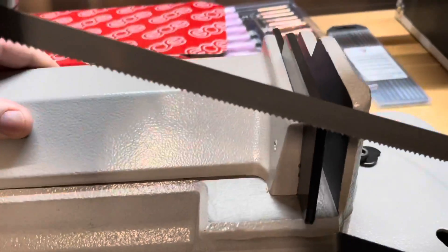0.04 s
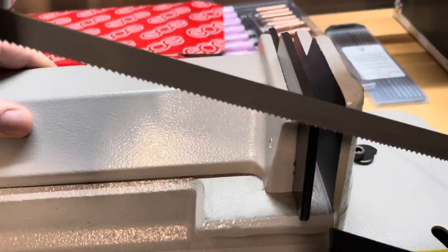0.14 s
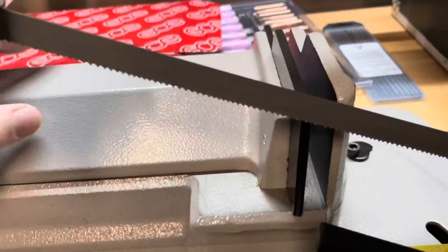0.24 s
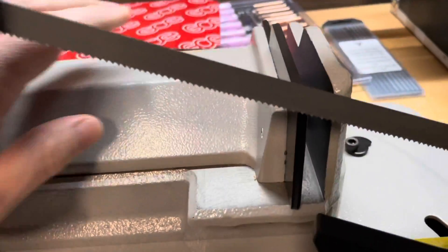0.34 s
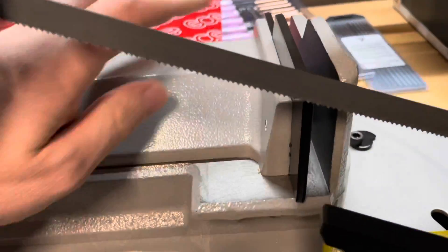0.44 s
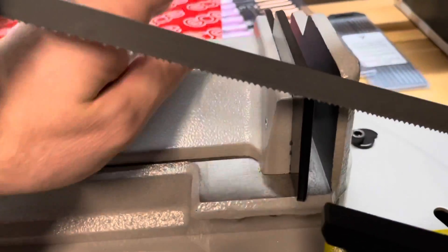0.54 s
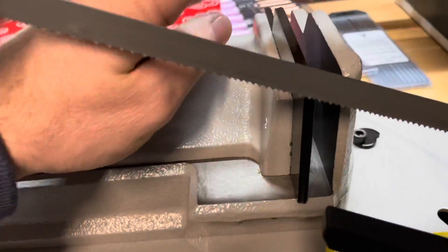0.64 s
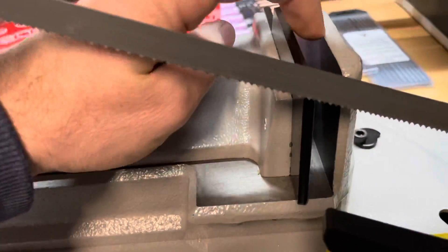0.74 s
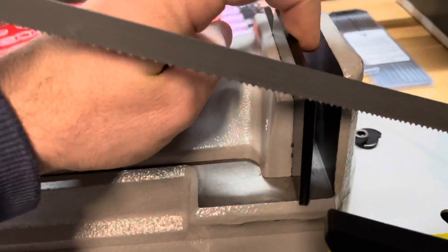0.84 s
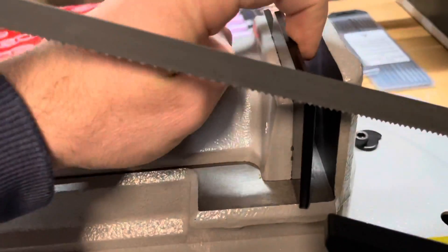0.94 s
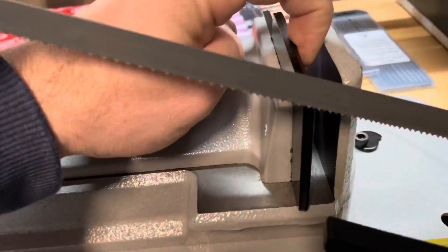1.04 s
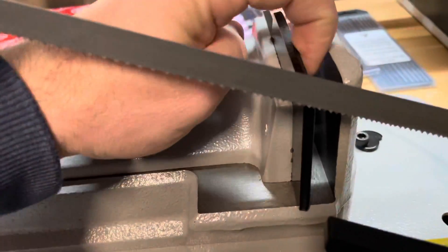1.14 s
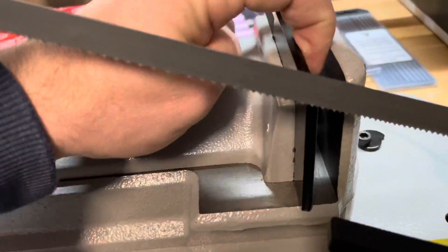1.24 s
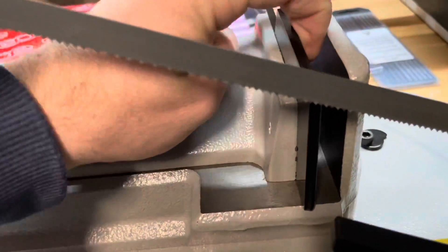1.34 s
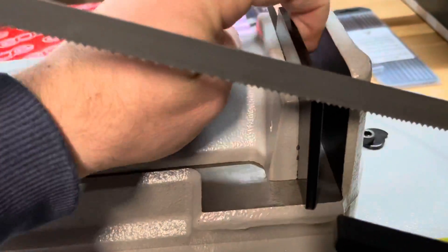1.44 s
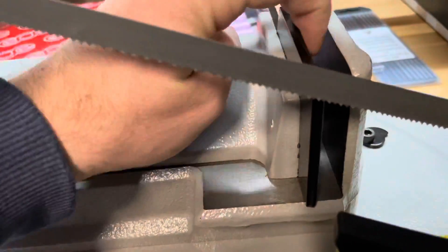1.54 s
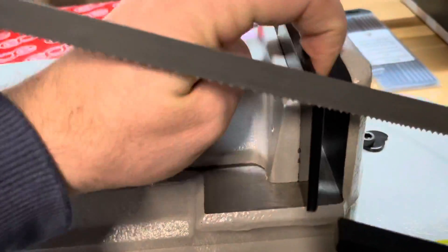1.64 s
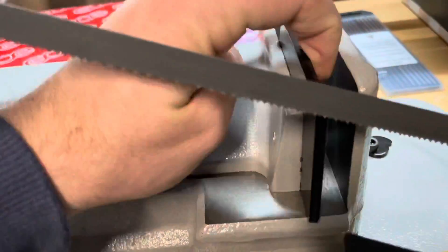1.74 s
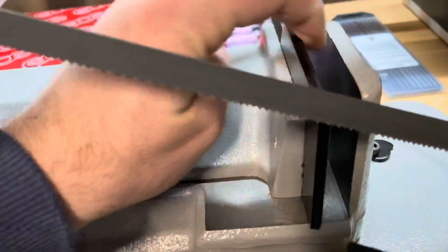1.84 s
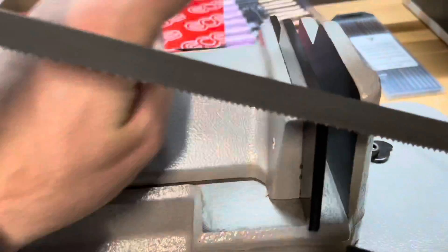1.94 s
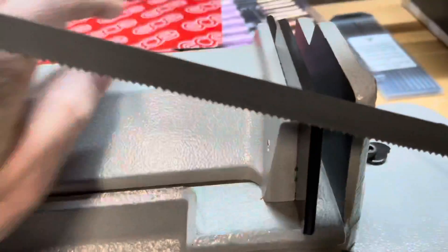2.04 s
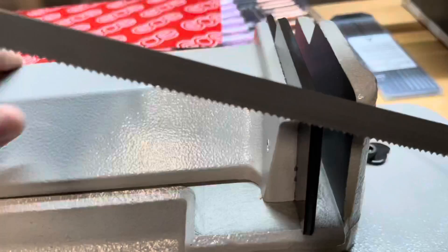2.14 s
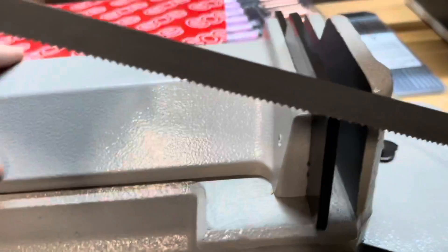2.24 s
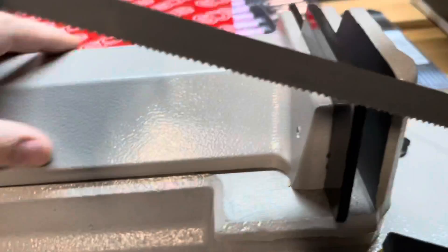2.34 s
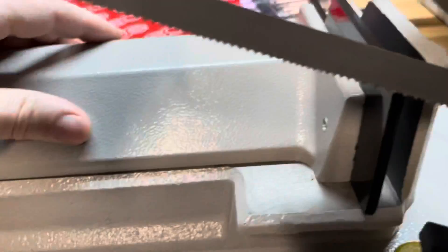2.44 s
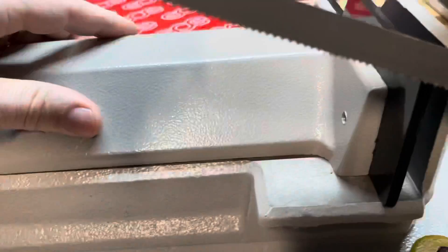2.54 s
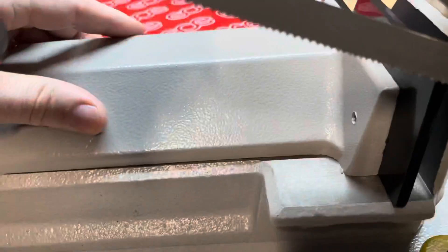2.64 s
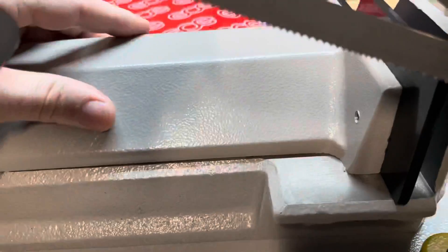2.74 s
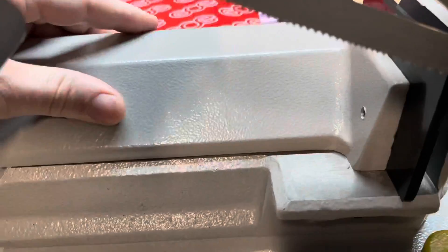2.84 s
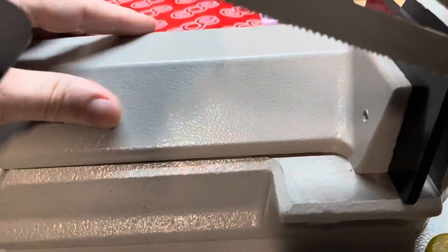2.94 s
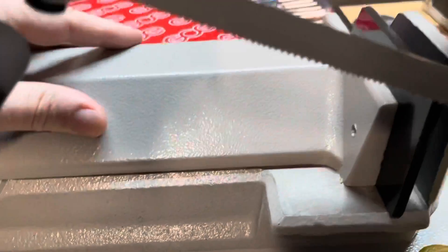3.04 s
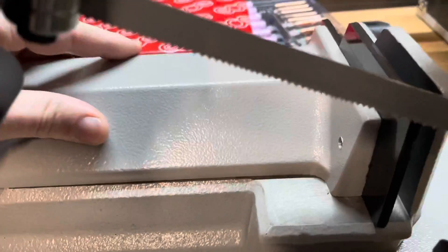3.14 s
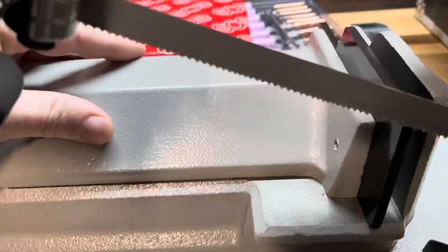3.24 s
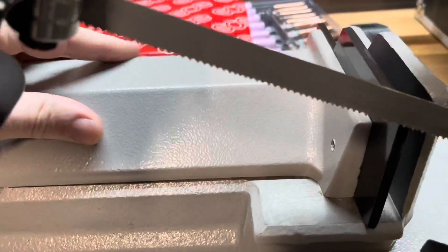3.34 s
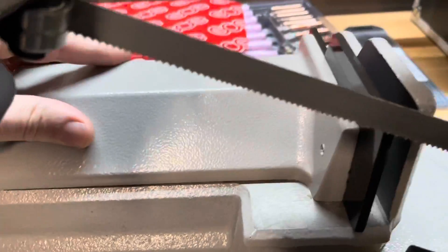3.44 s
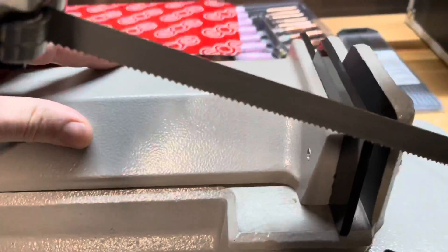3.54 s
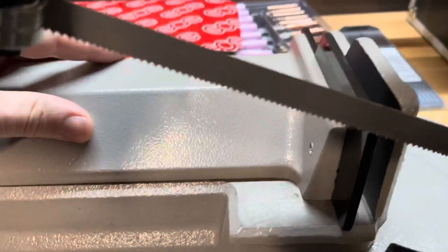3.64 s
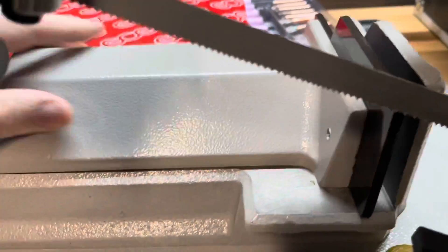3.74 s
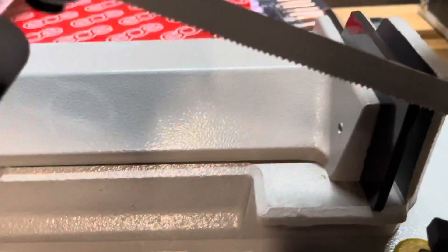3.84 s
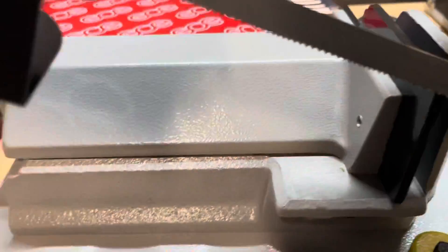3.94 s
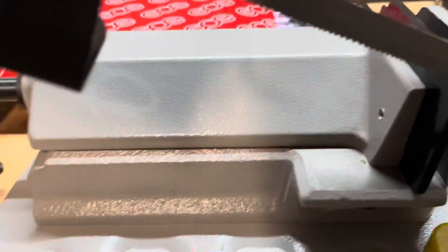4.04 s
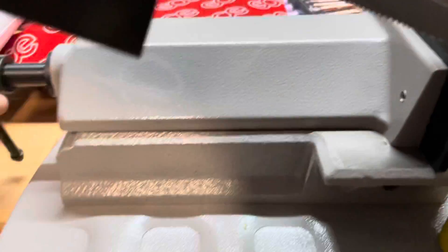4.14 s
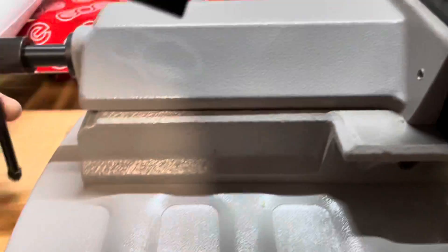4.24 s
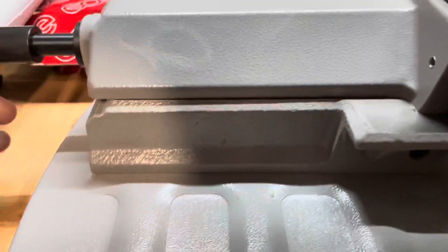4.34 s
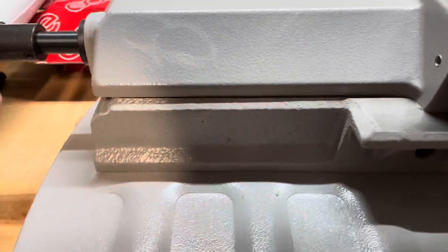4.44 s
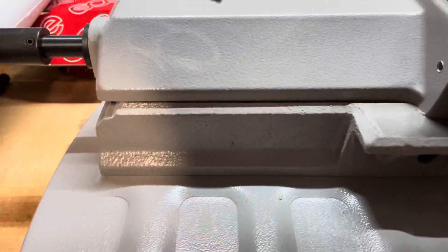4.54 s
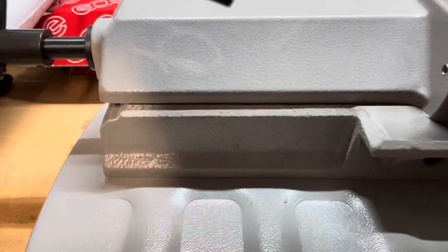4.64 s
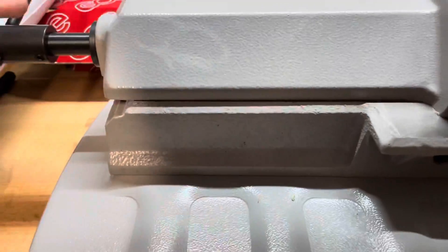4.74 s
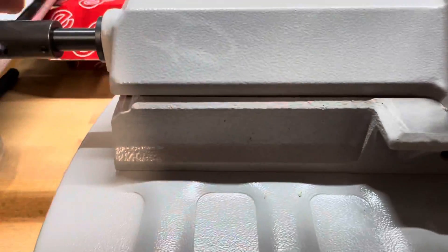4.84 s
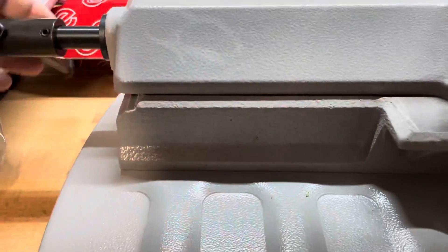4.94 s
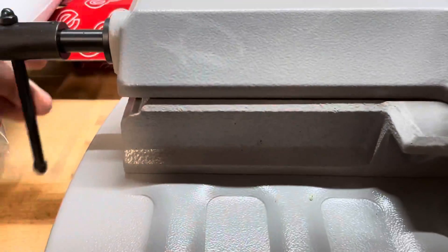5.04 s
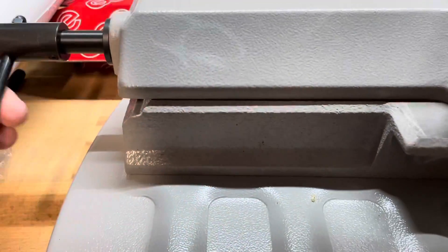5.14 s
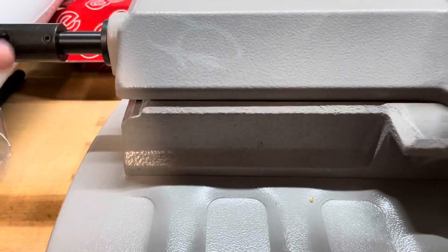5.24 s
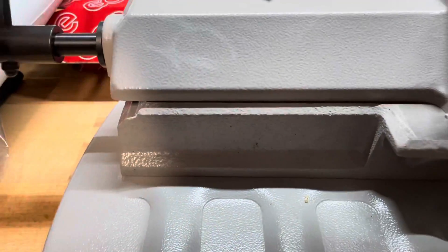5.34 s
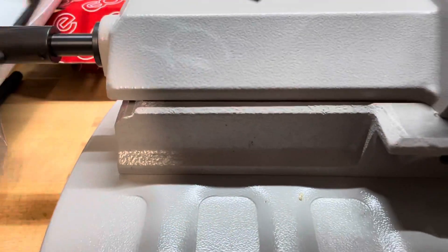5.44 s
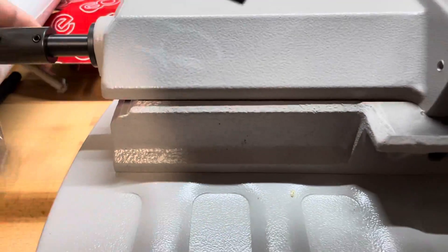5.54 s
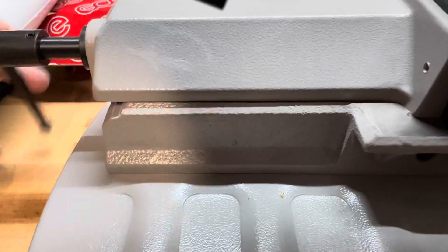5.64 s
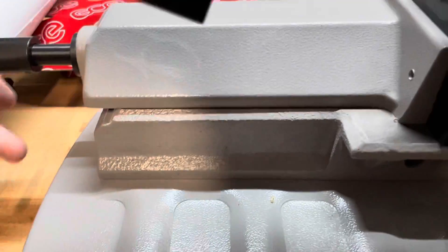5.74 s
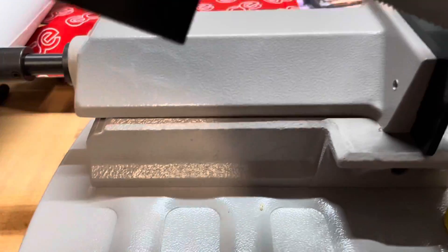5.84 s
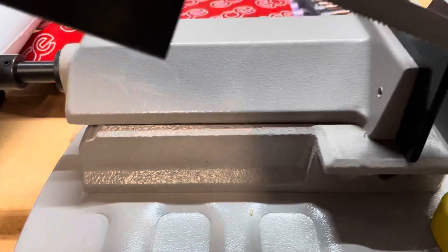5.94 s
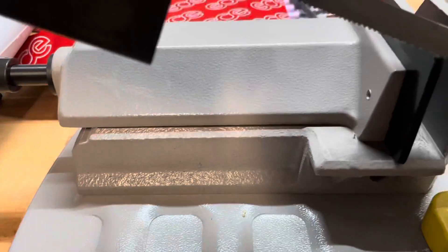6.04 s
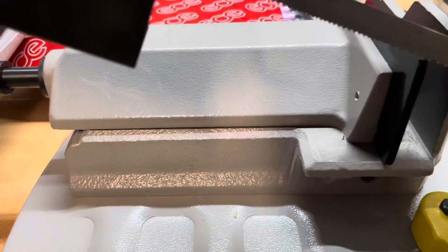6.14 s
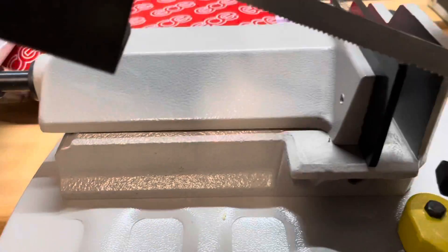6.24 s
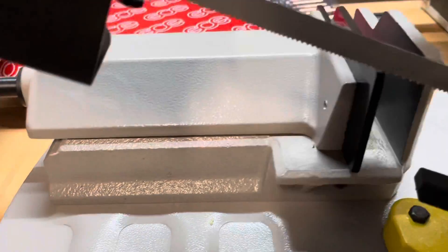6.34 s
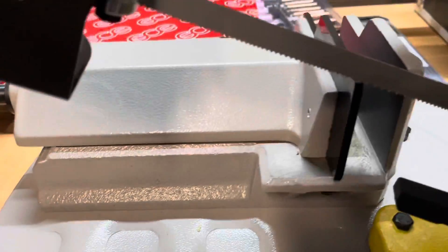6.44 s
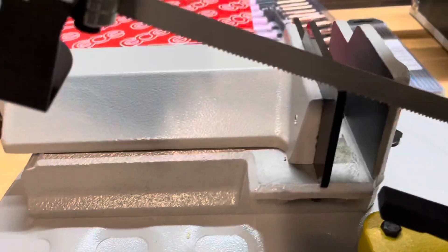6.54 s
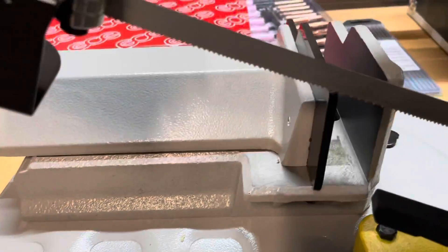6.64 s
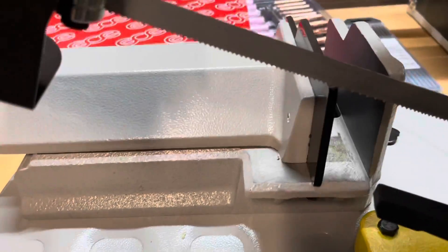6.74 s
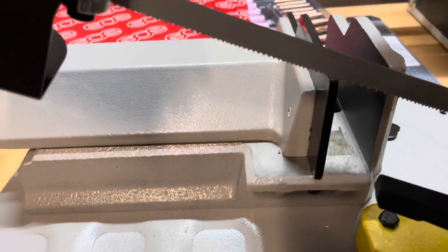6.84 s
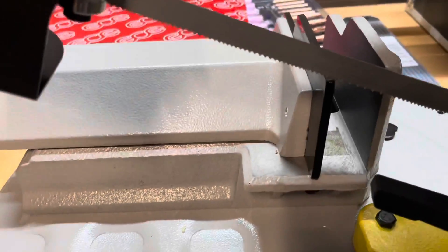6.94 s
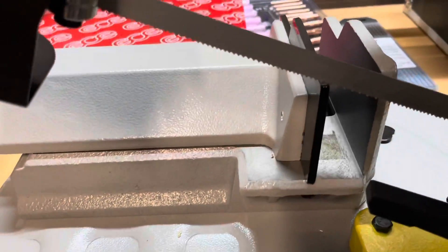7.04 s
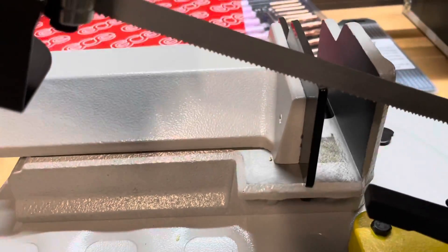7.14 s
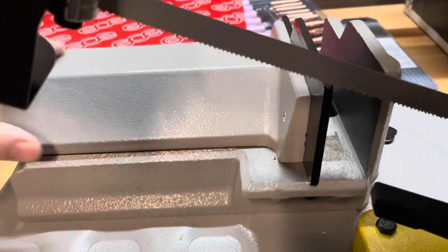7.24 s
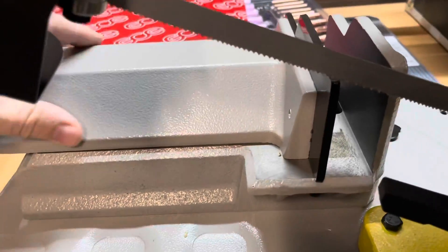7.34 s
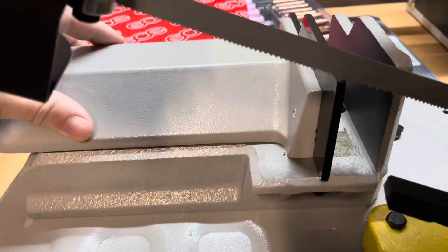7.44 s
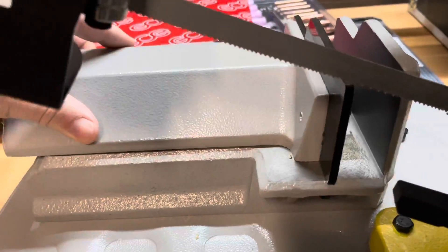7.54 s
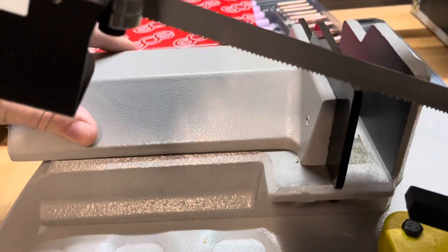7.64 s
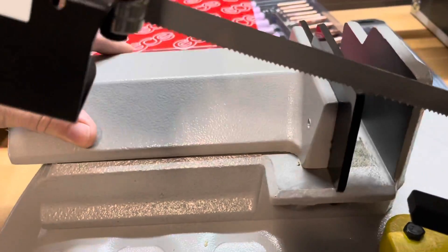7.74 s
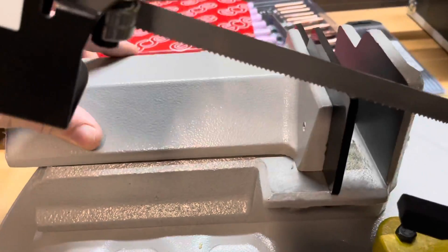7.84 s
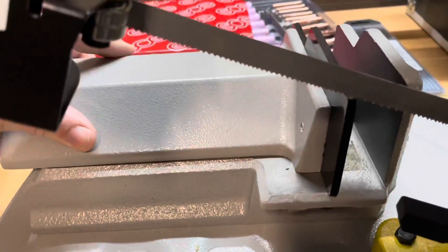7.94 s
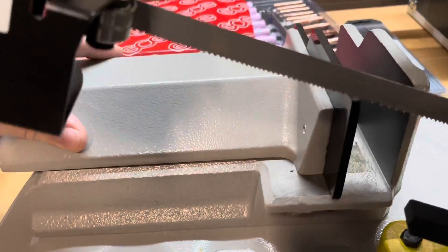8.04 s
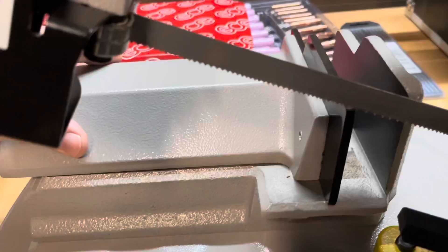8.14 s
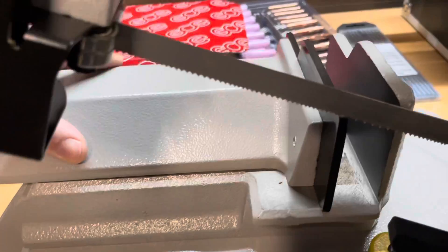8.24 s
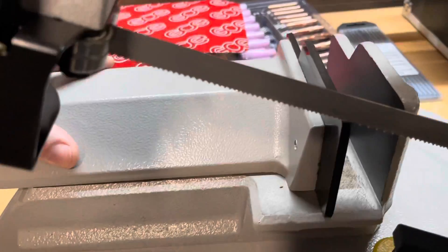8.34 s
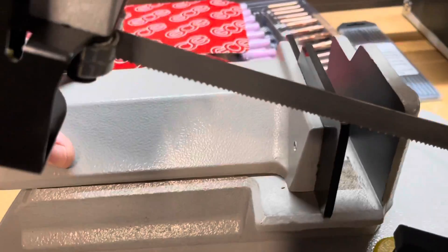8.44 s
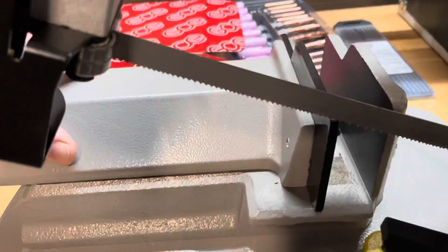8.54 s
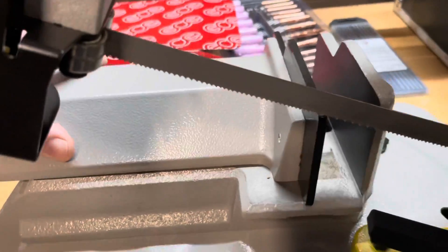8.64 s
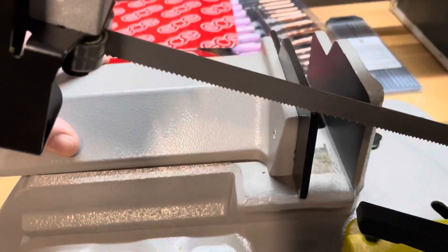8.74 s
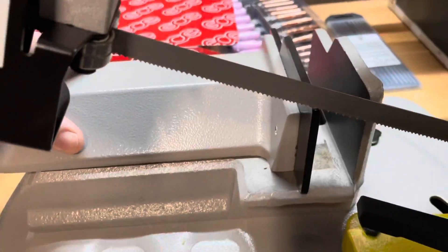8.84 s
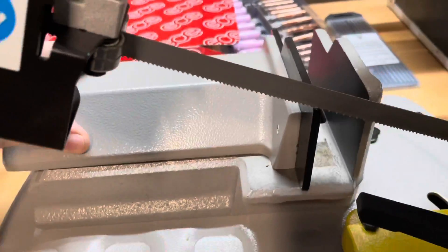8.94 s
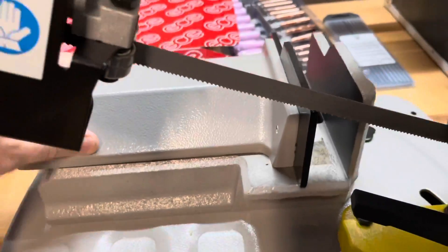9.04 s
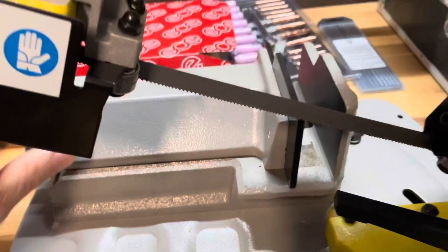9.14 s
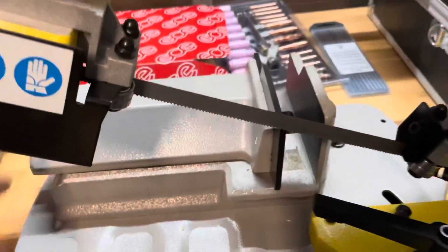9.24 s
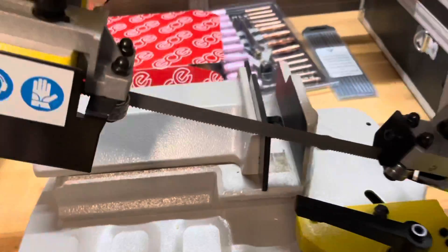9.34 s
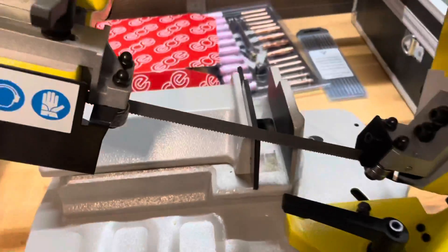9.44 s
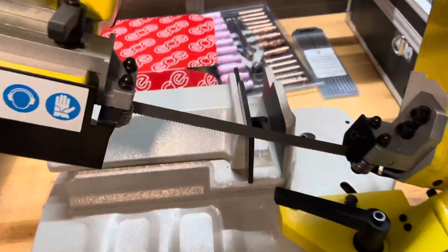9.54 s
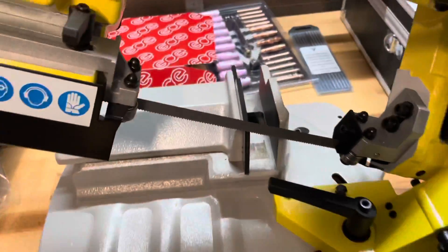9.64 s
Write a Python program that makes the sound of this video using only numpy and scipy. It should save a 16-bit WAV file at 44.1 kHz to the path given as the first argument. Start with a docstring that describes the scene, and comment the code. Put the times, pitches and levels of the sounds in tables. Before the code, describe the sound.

Heavy metal jaw knocks and chatters on a workbench, a screw is turned with rough rubbing, then the jaw clacks rapidly again before quiet rumble.

```python
"""First come a low rumble, a dying thump and ring, and light metal taps: a cast-iron saw vise on a bench.
Then a hand rattles the loose jaw to and fro, twice: metal touches, chatters and clacks, and the bench thumps.
Between the two rattles the jaw is cranked along its screw, with a gritty, singing rub.
Contacts are bursts of tiny impacts that ring modes (single fading tones); the rub is noise driving those modes.
Rumble, hiss and rustles are coloured noise; the workshop adds echoes."""
import sys
import numpy as np
from scipy import signal
from scipy.io import wavfile
from scipy.ndimage import uniform_filter1d

SR = 44100
rng = np.random.default_rng(int(sys.argv[2]) if len(sys.argv) > 2 else 0)


def generate_wav(signal):
    """Clip the signal to [-1, 1] and save it as 16-bit WAV at the path in sys.argv[1]."""
    frames = np.transpose(np.atleast_2d(signal))
    scaled = np.clip(frames, -1, 1) * 32767
    pcm = np.round(scaled).astype(np.int16)
    wavfile.write(sys.argv[1], SR, pcm)


N = 427756
TIME = np.arange(N) / SR

# Level of the low rumble over time: [t/s, level/dB]
RUMBLE_DRIFT = [(0, -46), (1.0, -61), (1.25, -54.5), (1.9, -58.5), (2.3, -54), (3.7, -55), (4.1, -55),
                (6.4, -57.5), (7.25, -54.5), (7.5, -67), (8.85, -51.5), (9.7, -59)]
# Colour of the rumble of building and bench: [f/Hz, relative level/dB per Hz]
RUMBLE_COLOUR = [(12, -45), (20, -25), (38, -8.5), (59, 2), (73, -9), (118, -14.5), (380, -26.5),
                 (600, -43), (780, -79)]
# Colour of the room-air hiss: [f/Hz, relative level/dB per Hz]
HISS_COLOUR = [(240, -27), (410, -2), (684, -5), (1280, -5), (1590, -13.5), (6320, -20.5), (9130, -23.5),
               (13000, -14.5), (15600, -22.5)]
# Tones of the bench under the base; rubbing shortens the ring times:
# [f/Hz, struck level/dB, ring time t60/s, rubbed level/dB]
BENCH_MODES = [(59.94, -20.5, 0.77, -45.5), (114.4, -17.5, 0.19, -47), (137.7, -19.5, 0.37, -2.5),
               (168, -30, 0.59, -6), (234.6, -11, 0.07, -1), (329.5, -20.5, 0.073, -1.5),
               (303, -2, 0.0078, -16.5), (387.8, -22, 0.14, 1), (454, -18.5, 0.063, -19),
               (572.8, -19, 0.11, -24)]
# Tones of the casting; each use below stretches or shortens the ring times:
# [f/Hz, struck level/dB, base ring time t60/s, rubbed level/dB]
IRON_MODES = [(638, -11, 0.18, -2.5), (773, -18, 1, 2), (944, -11, 0.44, -2.5), (1024, 8, 0.067, 3),
              (1101.4, -8, 0.47, 0), (1219.4, -12, 0.68, 0), (1420, -12.5, 0.45, -10.5),
              (1576, -14.5, 0.5, -3.5), (1961, -8.5, 0.23, -6.5), (2306, -13, 0.34, -7.5),
              (2781, -15, 0.42, -8), (3097, -17.5, 0.15, -10.5), (3280, -12.5, 0.08, -5.5),
              (3810, -14, 0.085, -9.5), (4150, -23.5, 0.3, -15), (4640, -25.5, 0.2, -7),
              (5020, -26.5, 0.15, -9.5), (6160, -33.5, 0.16, -13),]
# The many small tones of frame and blade, too close to tell apart: [f/Hz, relative level/dB per Hz]
DENSE_COLOUR = [(250, -7), (500, 8), (1400, 0.5), (2800, -11), (5000, -19.5), (8000, -30), (16000, -55)]
# Treble of a clack: [f/Hz, relative level/dB per Hz]
CRACK_COLOUR = [(4120, -35), (7000, 2.5), (9200, -30), (10400, -3), (11100, -18.5), (11800, -5),
                (12500, -13.5), (13300, -2), (14200, -18.5), (15600, -21)]
# Dust fizzing in the slide: [f/Hz, relative level/dB per Hz]
GRIT_COLOUR = [(7800, -40), (9200, -2), (13600, 0), (15000, -8), (15700, -20)]
# How fast echoes die: [f/Hz, ring time t60/s]
ROOM_DECAY = [(80, 1.6), (210, 0.15), (560, 0.46), (1470, 0.27), (3880, 0.31), (10200, 0.21)]
# Left-right likeness: [f/Hz, likeness from -1 (opposite) to 1 (same)]
CHANNEL_LIKENESS = [(60, .93), (150, .92), (300, .78), (640, .15), (3000, .35), (6500, .1), (8000, -.7),
                    (9500, -.7), (11000, .87)]
# Left-right balance: [f/Hz, left minus right level/dB]
CHANNEL_LEAN = [(60, -1.5), (200, -2), (350, -5.5), (700, -2), (2400, -2.5), (4400, 2), (12000, 0)]
# Other thumps of the base on the bench, some with a tap: [t/s, level/dB before the lift in thumps()]
OTHER_THUMPS = [(-.03, -12.5), (0.664, -41), (1.274, -53.5), (1.467, -36), (3.643, -29.5), (6.953, -40.5),
                (7.161, -57), (7.189, -56), (8.612, -27)]
# Lone taps of metal on metal:
# [t/s, peak level/dB, hardness/dB per octave, crack level/dB relative to peak before the cut in jaw(),
#  favoured mode f/Hz]
TAPS = [(0.001, -36, 4.5, -41, 3500), (0.135, -34.5, 1.5, -21, 1340), (0.189, -53, 16, -8, 3200),
        (0.218, -51.5, 3.5, -37, 2400), (0.655, -51.5, 0, -32, 770), (0.668, -43.5, 2, -18, 1420),
        (2.246, -61, 10.5, 3.5, 940), (2.446, -35.5, -4.5, -43, 929), (3.635, -32, 1, -54, 1162),
        (3.933, -46.5, -5, -18, 1280), (3.981, -43, -19, -31, 1247), (4.44, -35.5, 4, -9, 2780),
        (5.585, -30, -1, -32, 1040), (6.785, -41.5, -6, -38, 1110), (6.883, -52, -6, -37, 1236),
        (6.953, -36.5, 5.5, 0.5, 640), (8.607, -21, -19, -42, 1050)]
# The jaw crosses its play: it touches, slides home and clacks, and the base thumps the bench:
# [touch t/s, touch peak level/dB, slide time/ms, clack peak level/dB, clack hardness/dB per octave,
#  thump lag/ms, thump level/dB before the lift in thumps(),
#  crack level/dB relative to clack peak before the cut in jaw(), low and high favoured mode f/Hz]
STROKES = [(1.634, -33, 26.6, -23.5, -13.5, 9.1, -20, -41, 1220, 1950),
           (2.312, -30, 29.7, -19, 1, 16, -28.5, -49, 1200, 3040),
           (2.464, -16, 17.3, -9, 7, 8.2, -13.5, -19.5, 993, 2780),
           (2.683, -22.5, 13.2, -12, 3.5, 8.6, -9, -28.5, 1220, 3290),
           (2.854, -18, 29.8, -4, 5, 5.34, -10.5, -28, 1152, 2730),
           (3.064, -16, 12.2, -10.5, 2, 10.1, -8.5, -29.5, 1090, 3420),
           (3.232, -21.5, 25.9, -6, 5, 8.2, -10, -19.5, 1160, 2110),
           (3.444, -19.5, 10.9, -10.5, -3, 8.6, -9.5, -23, 1160, 3290),
           (7.552, -18, 19, -11.5, 7.5, 7, -10, -22.5, 1061, 1870),
           (7.752, -14, 16.5, -12, 4.5, 10.8, -8.5, -31.5, 1225, 3410),
           (7.933, -16, 19.7, -6, 7, 5.84, -9, -16.5, 960, 2580),
           (8.115, -14.5, 20.5, -17.5, 4, 8.3, -11.5, -24, 935, 1820),
           (8.3, -16, 17, -7.5, 7, 7.4, -10.5, -27, 998, 1974)]
# Skin and sleeve brush over paint and bench:
# [start t/s, length/s, level/dB at mid-swell, lowest f/Hz, highest f/Hz]
RUSTLES = [(0.1, 0.53, -69, 910, 2010), (1.834, 0.44, -76.5, 1220, 1500), (7.144, 0.15, -77, 894, 1497),
           (8.608, 1, -75, 1100, 2487), (8.895, 0.71, -78, 2540, 7550)]
# The hand turns the crank, stops and grips again; base levels before tight spots:
# [start t/s, end t/s, friction level/dB at start, at end, bench level/dB at start, at end]
TURNS = [(4.13, 4.609, -57, -46, -50.5, -51), (4.763, 5.458, -51.5, -50.5, -56, -46.5),
         (5.565, 6.73, -51.5, -51, -54.5, -45.5)]
# Tight spots in the thread: [peak t/s, extra friction level/dB, extra bench level/dB, singing mode f/Hz]
BINDS = [(4.408, 8.5, 16.5, 1220), (4.508, 10.5, 18, 640), (4.9, 5, 0, 1200), (5.106, 7.5, 2.5, 1150),
         (5.21, 7.5, 2.5, 650), (5.379, 8, -7, 640), (5.599, 7, -4, 1163), (5.793, 5.5, -2, 935),
         (5.97, 5.5, 0, 640), (6.238, 5.5, -4, 980), (6.36, 4, -14, 920), (6.513, 5.5, -18, 950),
         (6.677, 4.5, -14, 1220)]

# The shorter the slide, the harder and brighter the first touch; a longer one already jolts the bench more.
USUAL_SLIDE_MS = 17.8
TOUCH_HARDNESS_DB_PER_OCT, SOFTER_DB_PER_OCT_PER_MS = -0.5, 1
CLACK_HARDNESS_SHARE = 0.75
TOUCH_CHATTER_SHARE = 0.44  # share of the slide time
CLACK_CHATTER_MS, TAP_CHATTER_MS = 2.1, 1.5
TOUCH_CRACK_DB, TOUCH_CRACK_DB_PER_MS = -33, -1.5
TOUCH_JOLT_DB, TOUCH_JOLT_DB_PER_MS, TOUCH_JOLT_LAG_S = -11, 0.87, 0.01
TOUCH_SCUFF_DB, CLACK_SCUFF_DB, SCUFF_DB_PER_S = -22, -6, 1203  # scrape around each contact
REBOUND_S, REBOUND_DB = 0.036, -17.5  # the base drops back on its feet
DENSE_DB, DENSE_DB_PER_HARDNESS, DENSE_T60_S = -24.5, 0.11, 0.35
EARLIER_BLOW_DB = -37.5  # a blow just before the start still rings in the frame
FAVOURED_DB, SING_DB = 9, 10  # lift of the modes that a contact or a tight spot favours
LINGER_DB, LINGER_STRETCH, LINGER_FAVOURED_DB = -48.5, 1.4, 7.5  # faint ring once the parts separate
START_DB_PER_S, STOP_DB_PER_S, BENCH_STOP_DB_PER_S = 344, 605, 62
BIND_RISE_S, BIND_FALL_S = 0.094, 0.069
EDGE_HZ = 15760  # top of the band


def amp(db):
    """Turn decibels into a plain multiplier; 20 dB is ten times the amplitude."""
    return 10 ** (np.asarray(db) / 20)


def evened(x):
    """Scale a signal to an average strength (rms) of 1."""
    return x / np.sqrt(np.mean(x ** 2) + 1e-20)


def read(points, hz):
    """Read a curve at any pitch, with straight lines between points on a log pitch scale."""
    f, value = np.transpose(points)
    return np.interp(np.log(hz + 1), np.log(f + 1), value)


def near(hz, wanted_hz):
    """1 for a mode at the wanted pitch, falling off within a semitone or so."""
    return np.exp(-(np.log2(hz / wanted_hz) / 0.07) ** 2)


def placed(hz):
    """Place a mode left and right: lower likeness sets the two channels further apart in phase."""
    likeness = np.clip(read(CHANNEL_LIKENESS, hz), -1, 1)
    turn = np.arccos(likeness) * rng.choice([-0.5, 0.5])
    lean = amp(read(CHANNEL_LEAN, hz) / 2)
    return np.array([[lean * np.exp(1j * turn)], [np.exp(-1j * turn) / lean]])


def ring(force, hz, t60):
    """One mode driven by a force: it swings at its own pitch and fades by 60 dB in t60 seconds."""
    pole = np.exp((2j * np.pi * hz - np.log(1000) / t60) / SR)
    swing = signal.lfilter([1], [1, -pole], force.astype(complex))
    return (placed(hz) * swing).imag


def noise(spectrum, patchy_db, size=512):
    """Two-channel noise of a given colour with drifting patches, rms 1."""
    hz = np.fft.rfftfreq(size, 1 / SR)
    frames = N * 4 // size + 5
    a, b, c, d, patches = rng.standard_normal((frames, len(hz), 5)).T
    patches = uniform_filter1d(patches, size=6, axis=0)
    patches = evened(uniform_filter1d(patches, size=12, axis=1))
    same = np.clip(read(CHANNEL_LIKENESS, hz), -1, 1)[:, None]
    left, other = a + 1j * b, c + 1j * d
    z = np.array([left, same * left + np.sqrt(1 - same ** 2) * other])
    z *= amp(read(spectrum, hz)[:, None] + patchy_db * patches)
    z *= amp(np.multiply.outer([0.5, -0.5], read(CHANNEL_LEAN, hz)))[..., None]
    return evened(signal.istft(z, nperseg=size, noverlap=size * 3 // 4)[1][:, :N])


def background():
    """Building, bench and air: a lumpy, drifting low rumble and a faint hiss."""
    level = amp(np.interp(TIME, *np.transpose(RUMBLE_DRIFT)))
    rumble = level * noise(RUMBLE_COLOUR, 1.9, size=2048)
    return rumble + amp(-77.5) * noise(HISS_COLOUR, 3.1)


def jolts():
    """List each thump of the base [t/s, level/dB]: at touches, after clacks, and the other thumps."""
    s, touch_db, slide_ms, _, _, lag_ms, thump_db, *_ = np.transpose(STROKES)
    light_db = touch_db + TOUCH_JOLT_DB + TOUCH_JOLT_DB_PER_MS * (slide_ms - USUAL_SLIDE_MS)
    light = [s + TOUCH_JOLT_LAG_S, light_db]
    heavy = [s + (slide_ms + lag_ms) / 1000, thump_db]
    return np.vstack([np.transpose(light), np.transpose(heavy), OTHER_THUMPS])


def thumps():
    """The base lands on its feet, a soft-edged, quickly damped swing, rings the bench and rebounds lightly."""
    lead, t, long = SR // 10, TIME[:SR // 40], TIME[:SR // 2]
    bounce = np.sin(2 * np.pi * 330 * t) * amp(-60 * t / 0.016) * (1 - np.exp(-t / 0.0015))
    modes = np.array([(placed(hz) * np.exp(2j * np.pi * hz * long)).imag * amp(db - 60 * long / t60)
                      for hz, db, t60, _ in BENCH_MODES])
    modes = signal.fftconvolve(modes, bounce[None, None], axes=2)[..., :len(long)]
    out = np.zeros((2, lead + N + SR))
    hits = jolts()
    chances = rng.standard_normal((len(hits), 3, len(BENCH_MODES)))
    for (s, db), (spot, again, late) in zip(hits, chances):
        at = lead + round(s * SR)
        sound = np.tensordot(amp(2.5 * spot), modes, axes=1)  # every landing wakes the modes differently
        lag = round(REBOUND_S * SR * (1 + 0.16 * np.tanh(late[0])))
        sound[:, lag:] += np.tensordot(amp(REBOUND_DB + 3.5 * again), modes[..., :-lag], axes=1)
        out[:, at:at + len(long)] += sound * amp(db + 3.5) / np.abs(sound.mean(0)).max()
    return out[:, lead:lead + N]


def contacts():
    """List touches, clacks and taps: t/s, peak/dB, hardness, chatter/ms, crack/dB, scuff/dB, two modes/Hz."""
    (s, touch_db, slide_ms, clack_db, hardness, _, _,
     clack_crack_db, low_hz, high_hz) = np.transpose(STROKES)
    longer_ms = slide_ms - USUAL_SLIDE_MS
    touch_hardness = (TOUCH_HARDNESS_DB_PER_OCT + CLACK_HARDNESS_SHARE * hardness
                      - SOFTER_DB_PER_OCT_PER_MS * longer_ms)
    touch_crack_db = TOUCH_CRACK_DB + TOUCH_CRACK_DB_PER_MS * longer_ms
    touches = [s, touch_db, touch_hardness, TOUCH_CHATTER_SHARE * slide_ms,
               touch_crack_db, np.full(len(s), TOUCH_SCUFF_DB), low_hz, high_hz]
    clacks = [s + slide_ms / 1000, clack_db, hardness, np.full(len(s), CLACK_CHATTER_MS),
              clack_crack_db, np.full(len(s), CLACK_SCUFF_DB), low_hz, high_hz]
    taps = [(at, db, hard, TAP_CHATTER_MS, crack_db, TOUCH_SCUFF_DB, hz, hz)
            for at, db, hard, crack_db, hz in TAPS]
    return np.vstack([np.transpose(touches), np.transpose(clacks), taps])


def frame():
    """Each contact leaves a dense, noisy ring in the saw frame that dies evenly."""
    s, db, hardness = contacts().T[:3]
    kicks = np.zeros(N)  # powers, so that rings add as energy
    np.add.at(kicks, (s * SR).astype(int), amp(2 * (db + DENSE_DB + DENSE_DB_PER_HARDNESS * hardness)))
    kicks[0] += amp(2 * EARLIER_BLOW_DB)
    t = TIME[:SR // 2]
    decay = amp(-120 * t / DENSE_T60_S) * (1 - np.exp(-t / 0.004))
    power = signal.fftconvolve(kicks, decay)[:N]
    return np.sqrt(np.maximum(power, 0)) * noise(DENSE_COLOUR, 2.5, size=256)


def jaw():
    """A contact is a swelling, dying chatter of tiny impacts; place and hardness decide which modes it wakes."""
    lead, t, short, long = SR // 40, TIME[:SR // 14], TIME[:SR // 25], TIME[:SR // 3]
    hz, struck_db, t60, _ = np.array(IRON_MODES).T[:, :, None, None]
    heard = np.array([placed(f) for f in hz.ravel()])
    onset = 1 - np.exp(-long / 0.00028)  # a contact lasts a moment, so no mode starts at once
    linger_fade = amp(LINGER_DB - 60 * long / (LINGER_STRETCH * t60))
    lingering = (heard * np.exp(2j * np.pi * hz * long)).imag * linger_fade * onset
    iron, crack = np.zeros((2, N + SR)), np.zeros(N + SR)
    hits = contacts()
    places = rng.standard_normal((len(hits), 2, len(IRON_MODES), 1, 1))
    slips = rng.standard_normal((len(hits), len(t)))
    for hit, (spot, shift), slip in zip(hits, places, slips):
        s, db, hardness, chatter_ms, crack_db, scuff_db, low_hz, high_hz = hit
        at = round(s * SR)
        u = np.maximum(t - lead / SR, 0) * 1000 / max(chatter_ms, 0.2)
        # the jaw scuffs its guide: the scrape grows up to the contact and fades after it
        scuff = amp(scuff_db - SCUFF_DB_PER_S * np.abs(t - lead / SR))
        fade = u ** 0.71 * np.exp(1 - u) + scuff
        chatter = slip ** 3 * fade  # cubing leaves a few strong impacts among many weak ones
        share = amp(struck_db + hardness * np.log2(hz / 1100) + 1.5 * spot)
        favoured = near(hz, low_hz) + near(hz, high_hz)
        # most of the ring is lost at once into hand and base, and the touching parts shift its pitch
        shifted_hz = hz * (1 + 0.022 * shift)
        damped = np.exp(2j * np.pi * shifted_hz * short) * amp(-60 * short / (0.11 * t60))
        modes = (share * amp(LINGER_FAVOURED_DB * favoured + 2 * shift) * lingering).sum(0)
        struck = (share * amp(FAVOURED_DB * favoured) * heard * damped).imag.sum(0)
        modes[:, :len(short)] += struck * onset[:len(short)]
        sound = signal.fftconvolve(modes, chatter[None], axes=1)
        sound *= amp(db) / np.abs(sound.mean(0)).max()
        iron[:, at:at + sound.shape[1]] += sound
        crack[at:at + len(t)] += amp(db + crack_db) * fade
    treble = amp(-9.5) * crack[lead:lead + N] * noise(CRACK_COLOUR, 4.0, size=256)
    return iron[:, lead:lead + N] + treble


def rustles():
    """Skin and sleeve brush by: short swishes of patchy noise, each in its own band, swelling and fading."""
    cloth = noise([(100, 0), (20000, 0)], 1.5, size=256)
    out = np.zeros((2, N + SR))
    for s, length, db, low_hz, high_hz in RUSTLES:
        at = round(s * SR)
        band = signal.butter(3, [low_hz, high_hz], "band", fs=SR, output="sos")
        swish = evened(signal.sosfilt(band, cloth[:, at:at + round(length * SR)]))
        swell = np.sin(np.pi * np.arange(swish.shape[1]) / SR / length)
        out[:, at:at + swish.shape[1]] += amp(db) * swell * swish
    return out[:, :N]


def effort(t):
    """Friction and bench gains, and tight-spot swells: each turn starts, drifts and stops, changed by binds."""
    s, friction_lift_db, bench_lift_db, _ = np.transpose(BINDS)
    late = t - s[:, None]
    swell = np.maximum(1 - np.where(late < 0, -late / BIND_RISE_S, late / BIND_FALL_S), 0)
    friction = bench = 0
    for start, end, from_db, to_db, bench_from_db, bench_to_db in TURNS:
        before_db = START_DB_PER_S * np.maximum(start - t, 0)
        after = np.maximum(t - end, 0)
        friction_db = np.interp(t, [start, end], [from_db, to_db])
        bench_db = np.interp(t, [start, end], [bench_from_db, bench_to_db])
        friction = friction + amp(friction_db - before_db - STOP_DB_PER_S * after)
        bench = bench + amp(bench_db - before_db - BENCH_STOP_DB_PER_S * after)
    return friction * amp(friction_lift_db @ swell), bench * amp(bench_lift_db @ swell), swell


def crank():
    """Uneven slips under the turning screw excite casting and bench, blurring high modes most; dust fizzes."""
    span = slice(round((TURNS[0][0] - 0.2) * SR), round((TURNS[-1][1] + 0.5) * SR))
    t, out = TIME[span], np.zeros((2, N))
    wander = evened(uniform_filter1d(rng.standard_normal(len(t)), size=500))
    grip = amp(2.0 * wander)  # the load wavers
    friction, load, swell = effort(t)
    sung_hz = np.transpose(BINDS)[3]

    def rubbed(modes, damping):
        """Random slips drive every mode; a tight spot makes the modes near its pitch sing."""
        shift = uniform_filter1d(rng.standard_normal((len(modes), len(t))), size=4000, axis=1)
        shift = evened(shift)  # the rubbing spot moves
        slip_db = 2.0 * np.minimum(rng.exponential(1, len(t)), 4)
        slips = grip * amp(2.35 * shift + slip_db) * rng.standard_normal(shift.shape)
        total = 0
        for force, (hz, _, t60, db) in zip(slips, modes):
            tone = evened(ring(force, hz, damping * t60 * min(1, 2200 / hz)))
            total = total + amp(db + SING_DB * near(hz, sung_hz) @ swell) * tone
        return evened(total)

    bench = load * rubbed(BENCH_MODES, 0.79)
    grit = amp(-22.5) * grip * noise(GRIT_COLOUR, 0.52, size=256)[:, span]
    dense = amp(-7.5) * grip * noise(DENSE_COLOUR, 3.4, size=256)[:, span]
    iron = rubbed(IRON_MODES, 0.13) + dense
    out[:, span] = friction * (iron + grit) + bench
    return out


def workshop(x):
    """Sparse echoes of random sign, each band dying at its own speed; the bass is much alike left and right."""
    taps = np.zeros((2, SR // 2))
    at = np.arange(200, SR // 2 - 20, 20) + rng.integers(0, 20, (2, (SR // 2 - 201) // 20))
    np.put_along_axis(taps, at, rng.choice([-1., 1.], at.shape), 1)
    hz, t, (left, other) = signal.stft(taps, SR, nperseg=256)
    same = np.clip(read(CHANNEL_LIKENESS, hz), -1, 1)[:, None]
    z = np.array([left, same * left + np.sqrt(1 - same ** 2) * other])
    fade = amp(-60 * t / read(ROOM_DECAY, hz)[:, None])
    tail = signal.istft(z * fade, SR, nperseg=256)[1]
    # the right channel's sound feeds the echoes of both
    return signal.fftconvolve(x[1:], tail / np.linalg.norm(tail[0]), axes=1)[:, :N]


def scene():
    """Add up vise, bench and echoes, thin their deep bass, then add the background and rustles."""
    iron, bench, screw = jaw(), thumps(), crank()
    echoes = workshop(amp(-16) * iron + amp(-12.0) * bench + amp(-8) * screw)
    vise = iron + frame() + bench + screw + echoes
    thinned = signal.butter(2, 85, "high", fs=SR, output="sos")  # the microphone passes little deep bass
    return signal.sosfilt(thinned, vise) + background() + rustles()


def record(dry):
    """A soft curve rounds off the loudest peaks; then a steep filter removes the top of the treble."""
    lowpass = signal.firwin(2047, EDGE_HZ, window=("kaiser", 9), fs=SR)
    return signal.oaconvolve(np.tanh(dry), lowpass[None], "same")


dry = scene()
out = record(dry)
generate_wav(out)
```